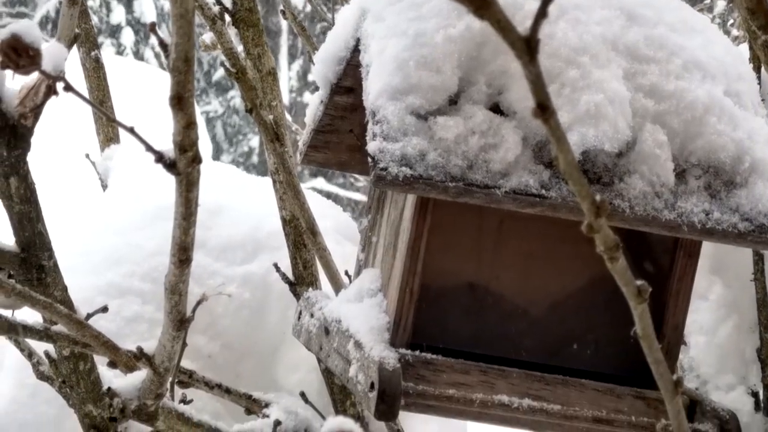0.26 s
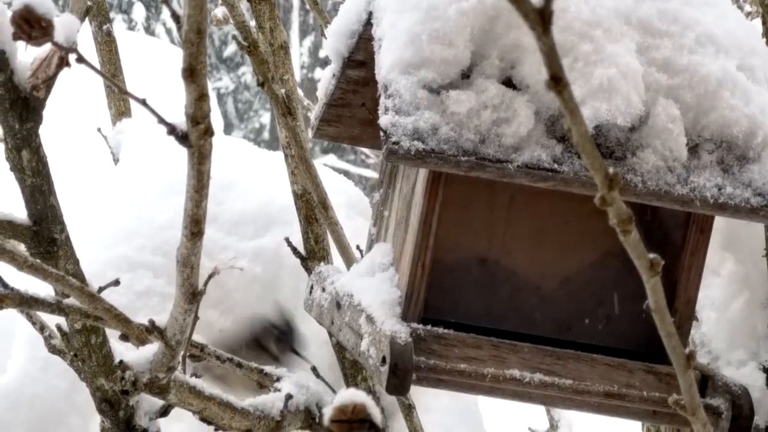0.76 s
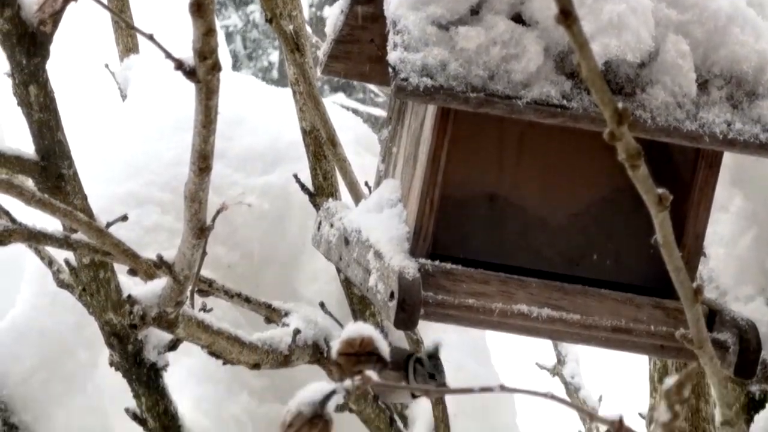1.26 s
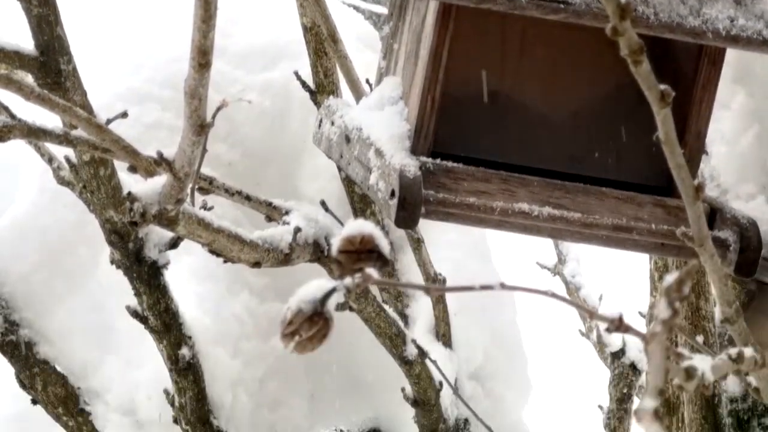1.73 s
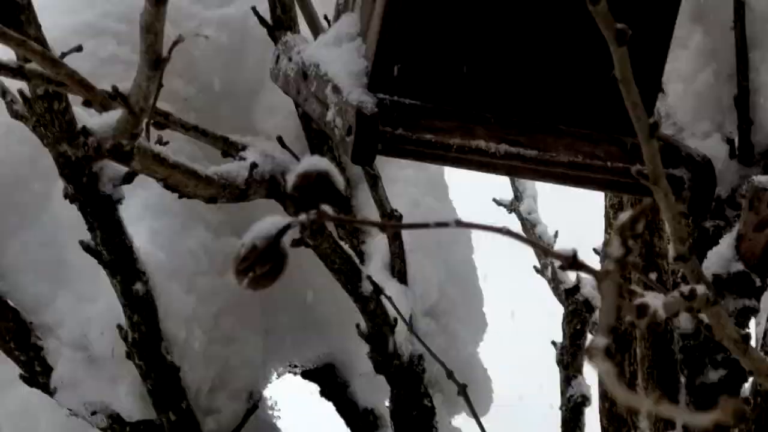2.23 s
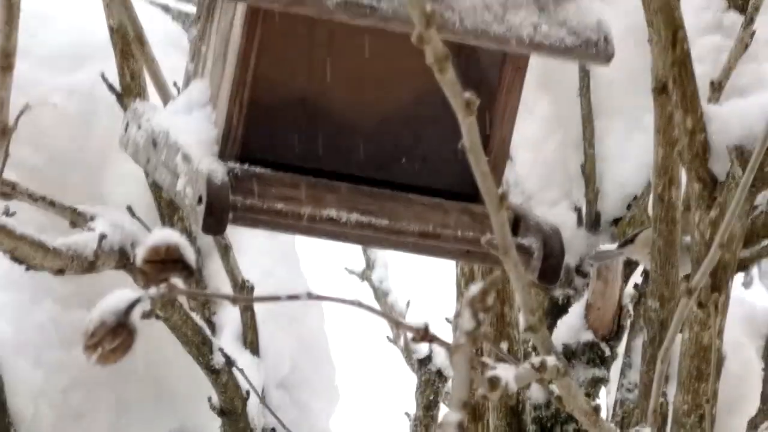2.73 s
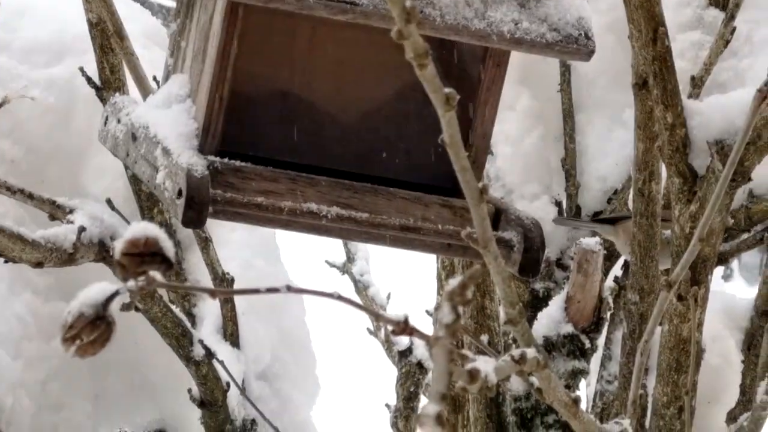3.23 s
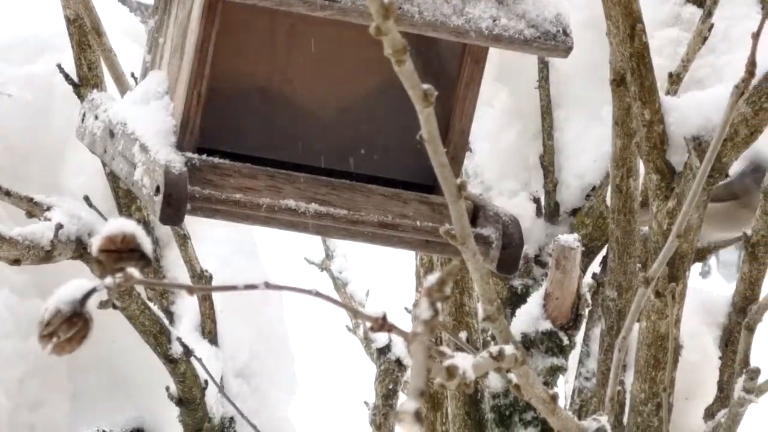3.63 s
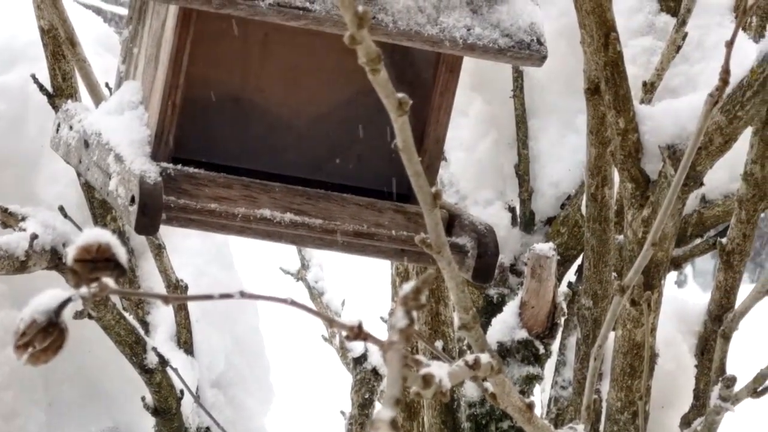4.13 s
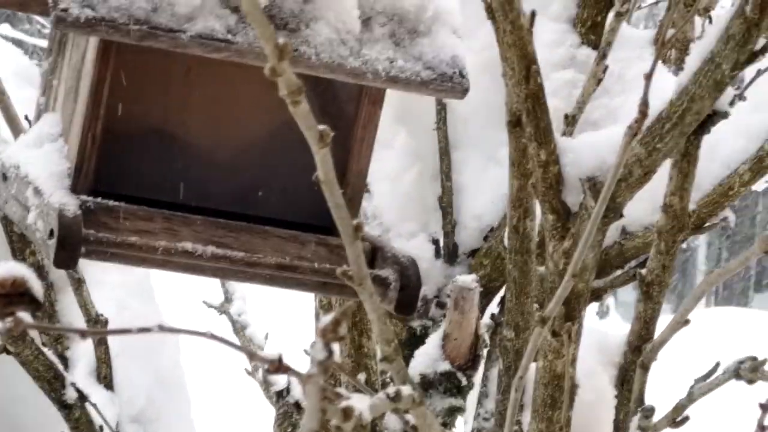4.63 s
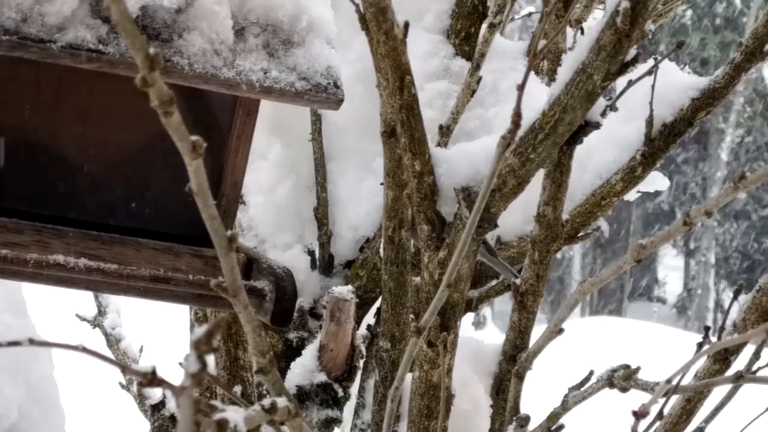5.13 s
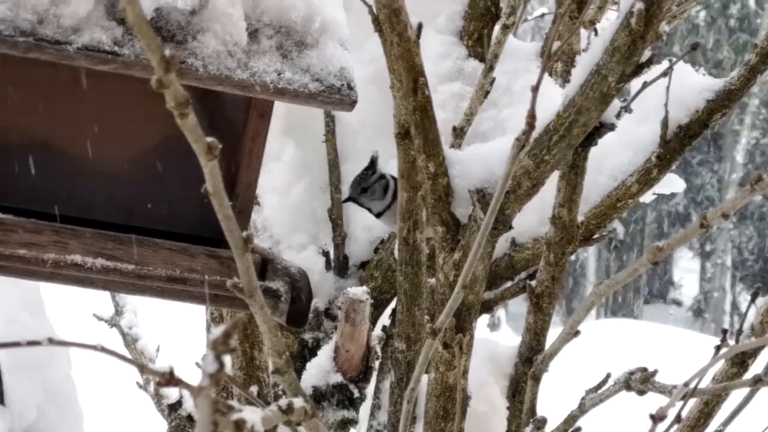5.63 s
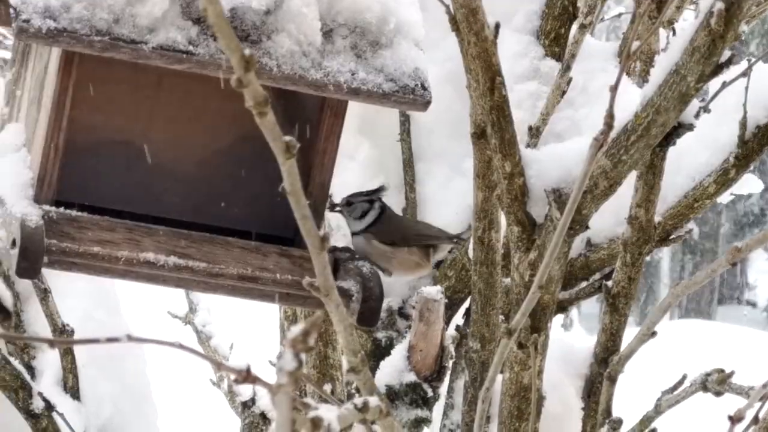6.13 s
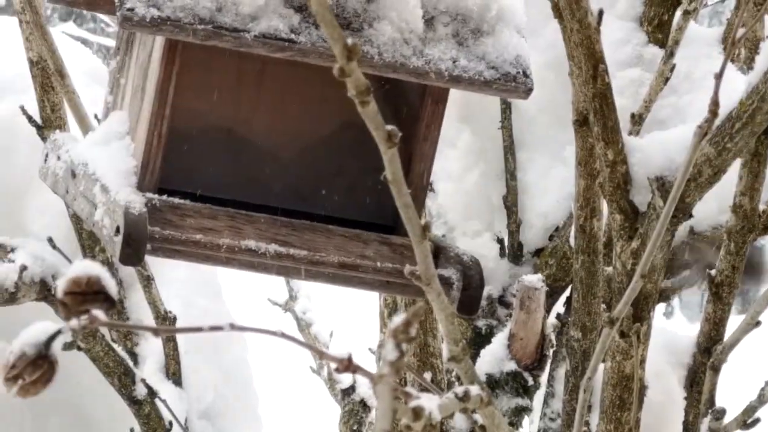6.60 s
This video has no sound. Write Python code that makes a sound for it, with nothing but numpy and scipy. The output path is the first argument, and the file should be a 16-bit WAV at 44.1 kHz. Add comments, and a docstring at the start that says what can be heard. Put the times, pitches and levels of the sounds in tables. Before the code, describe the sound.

Stereo outdoor microphones near a feeder pick up two rapid, rolling tit trills, one at the start and one just after the middle. Between them come dry taps, dull snow bumps on the left, gliding whistles and a blurred distant flock. Short bird peeps sit to the right, wings whirr briefly, and faint rushing and low buffeting come and go. Sparse echoes among branches soften the farther calls.

```python
"""Snowy garden with a wooden feeder: a crested tit gives two purring trills (harmonic sums) and thin contact notes.
Other tits whistle and chirp further off (gliding tones with echoes); a distant flock is many blurred slurs.
Wings whirr (pulsed noise); snow taps twigs (short rings) and thumps on the left microphone (low-cut pulses).
A high hiss lies under the first trill and then drops; the nearly still air has faint rush and buffeting (noise)."""
import sys
import numpy as np
from scipy import signal
from scipy.fft import rfft, irfft
from scipy.io import wavfile

SR = 44100
rng = np.random.default_rng(int(sys.argv[2]) if len(sys.argv) > 2 else 0)


def wav_record(signal):
    """Record a signal, one row per channel, as 16-bit PCM in the file named by sys.argv[1]."""
    frames = np.transpose(np.atleast_2d(signal))
    bounded = np.clip(frames, -1, 1)
    # unit amplitude maps onto the largest positive 16-bit level
    quanta = np.round(bounded * 32767).astype(np.int16)
    wavfile.write(sys.argv[1], SR, quanta)


N = 302526
TIME_S = np.arange(N) / SR

# Still air and microphone hiss: (frequency [Hz], relative density [dB])
AIR_SPECTRUM = [(12, -49), (20, 0.5), (176, -9), (260, -15), (316, -13.5), (508, -19), (618, -19),
                (1020, -23.5), (1890, -22.5), (2170, -26), (3680, -26.5), (4870, -22.5), (9770, -37.5),
                (13700, -27.5), (15700, -27)]
# Microphone colour: (frequency [Hz], gain [dB])
MIC_TREBLE = [(3500, 1), (4200, -10), (4800, -6), (5600, -1), (6600, 3), (7600, -4), (8800, -1.5),
              (10000, -5.5), (11500, 0), (13200, 2), (15800, -0.5)]
# Left-right likeness of still air: (frequency [Hz], correlation [-1 to 1])
AIR_LIKENESS = [(60, 0.085), (150, 0.43), (380, 0.34), (950, 0), (2380, 0), (5980, 0.01), (15000, -0.0)]
AIR_LEVEL_DB = -64  # before MIC_TREBLE

# Narrow high hiss: (frequency [Hz], relative level [dB])
HISS_SPECTRUM = [(1000, -23), (2500, -23), (3600, -20), (4200, -5), (4500, 1.5), (4800, 5), (5400, -17.5),
                 (6700, -10.5), (7350, 2), (7800, -2.5), (8400, -11), (9500, -26.5), (12000, -32),
                 (15000, -25)]
# Hiss level before left-right skew: (time [s], level [dB])
HISS_LEVEL = [(0, -53), (.52, -53), (.55, -74.5)]

# Rush in the trees: (frequency [Hz], relative level [dB])
RUSH_SPECTRUM = [(60, 1.5), (200, 3), (450, 4.5), (850, 3), (1300, -5), (2000, -7), (3000, -8.5),
                 (8000, -52)]
# Rush swells before RUSH_TRIM_DB: (time [s], half width [s], level [dB])
BREEZE_SWELLS = [(1.1, 0.4, -73), (2.4, 0.48, -66), (4.85, 0.28, -68), (5.95, 0.24, -61.5),
                 (6.4, 0.11, -66)]
BREEZE_CALM_DB, RUSH_TRIM_DB = -79, -3.5  # calm is also before trim

# Buffeting: (frequency [Hz], relative level [dB])
BUFFET_SPECTRUM = [(4, -12), (15, -3.5), (30, -13), (60, -15.5), (200, -41.5), (1000, -76)]
# Gusts on the microphones before GUST_TRIM_DB: (time [s], half width [s], level [dB])
GUST_SWELLS = [(.76, .07, -65), (1.57, 0.053, -54.5), (2.8, 0.21, -60.5), (3.49, 0.047, -48),
               (4.79, 0.11, -51), (6.86, 0.07, -48.5)]
GUST_CALM_DB, GUST_UNEVEN_DB, GUST_TRIM_DB = -65.5, 1, -2.5  # calm is also before trim

# Bouts of the distant flock: (time [s], half width [s], level [dB])
FLOCK_BOUTS = [(1.85, 0.071, -61.5), (4.9, 0.19, -66.5), (6.47, 0.22, -69)]
FLOCK_CALM_DB = -77

# Wing whirrs: (time [s], length [s], level before beat and fade [dB], beat rate [1/s])
WING_FLIGHTS = [(3.427, 0.13, -52, 24.6), (3.778, 0.16, -58.5, 29), (6.625, 0.29, -64.5, 25.7)]
# Wing noise: (frequency [Hz], relative level [dB])
WING_SPECTRUM = [(15, -30), (35, -8), (85, 4), (140, -6), (240, -7), (400, -25), (800, -22.5),
                 (1500, -30.5), (4000, -36), (7500, -28), (10000, -45), (15000, -41)]

# Snow landing on the left microphone: (time [s], push level before shaping [dB], decay [s])
SNOW_THUMPS = [(1.26, -33, 0.011), (1.3488, -27.5, 0.0056), (1.563, -23.5, 0.0019), (1.8313, -27.5, 0.0022),
               (1.894, -37.5, 0.0039), (2.356, -33, 0.0068), (2.4655, -35, 0.0016), (3.152, -38, 0.0017),
               (4.5356, -29.5, 0.0027), (4.613, -24.5, 0.0013), (5.862, -39.5, 0.004),
               (6.416, -28, 0.00075), (6.457, -31, 0.0013)]
# Snow tapping wood and twigs: (time [s], level [dB], ring [Hz])
SNOW_TAPS = [(1.604, -51.5, 800), (1.686, -51.5, 900), (1.8663, -41, 855), (1.9227, -41.5, 965),
             (1.88, -49, 6760), (2.645, -50, 5200), (2.677, -46.5, 4750), (2.7147, -41.5, 4800),
             (2.803, -57, 3000), (2.8175, -54, 2500), (3.145, -48, 13470)]
TAP_DECAY_1KHZ_S, TAP_DECAY_POWER = 0.0016, 0.43  # higher taps are shorter

# Hoarse chirps from the trees, before pan and echo:
# (time [s], length [s], start pitch [Hz], end pitch [Hz], rms level [dB])
TREE_CHIRPS = [(0.794, 0.031, 3180, 4560, -62), (1.177, .055, 7150, 6380, -71.5),
               (1.338, 0.037, 7540, 4170, -72), (1.479, 0.058, 4960, 3440, -66),
               (1.74, 0.081, 3510, 5430, -67), (4.842, 0.016, 4800, 3130, -56),
               (4.912, 0.097, 2980, 4100, -72.5), (5.005, 0.11, 3580, 5040, -71),
               (5.273, .1, 3230, 4510, -66), (6.384, 0.059, 5800, 4330, -59.5),
               (6.681, 0.045, 4700, 4880, -61), (6.726, 0.049, 4920, 5030, -58)]
CHIRP_ROUGH, CHIRP_ECHO_DB, CHIRP_PAN_DB = 0.425, -3.5, 1.5
# Whistled slurs further off, before pan and echo: (time [s], length [s], start pitch [Hz],
# middle pitch [Hz], end pitch [Hz], rms level [dB], left over right [dB])
FAR_WHISTLES = [(1.643, 0.23, 7100, 6235, 5550, -58.5, 0.5), (1.666, 0.16, 5500, 5230, 5000, -69, 5),
                (1.79, .19, 4960, 4810, 4820, -67, 9), (1.801, .075, 1624, 1710, 2040, -71, 2),
                (1.812, .078, 3300, 3560, 4400, -58.5, 4), (1.97, 0.16, 7900, 7870, 7550, -72.5, -14),
                (2.126, .09, 4300, 4520, 4400, -75, 5), (2.4, 0.063, 4250, 4550, 4400, -74, 3),
                (2.55, 0.084, 3950, 4250, 4300, -75.5, 6), (3.073, .095, 4800, 4880, 4620, -57.5, -8),
                (3.147, .13, 4585, 4370, 4180, -61, -3.5), (3.292, .045, 3700, 3290, 3170, -71, 4),
                (4.583, .12, 6150, 5920, 5500, -73, -1), (5.046, 0.089, 2640, 2715, 2770, -72.5, 5),
                (5.306, 0.063, 4440, 4850, 4530, -63, 1), (5.356, 0.061, 4340, 4650, 4870, -68, -2),
                (5.422, 0.032, 3165, 3090, 3030, -66.5, -1.5), (5.442, 0.2, 7590, 7080, 7137, -74.5, -11),
                (5.948, 0.085, 4900, 4890, 4340, -69, -4.5), (6.473, 0.12, 4020, 4160, 4300, -60.5, -2)]
WHISTLE_ROUGH, WHISTLE_ECHO_DB = 0.16, -6
# Contact notes of the near bird, before pan and echo:
# (time [s], length [s], top pitch [Hz], rms level [dB])
CONTACT_NOTES = [(0.713, 0.038, 7540, -68), (1.938, .075, 7950, -71.5), (2.331, 0.025, 8000, -69.5),
                 (3.242, .024, 6970, -47), (5.78, 0.05, 8770, -66.5), (5.944, .042, 8620, -66.5),
                 (6.018, .06, 8220, -66), (6.117, 0.078, 8350, -59.5), (6.227, 0.066, 8330, -61.5),
                 (6.362, .064, 8470, -62.5), (6.614, .027, 7530, -43.5), (6.666, 0.035, 7700, -67)]
CONTACT_DROOP = 0.18  # both ends lie this share under the top
CONTACT_PAN_DB, CONTACT_ROUGH, CONTACT_ECHO_DB = -11, 0.15, -10

# Trill syllables, level before throat, attack and pan:
# (time at arch top [s], pitch there [Hz], level [dB])
TRILL_SYLLABLES = [ (0.048, 1803, -39), (0.093, 1850, -35), (.141, 1915, -36), (.190, 1946, -34),
                   (0.241, 1880, -36), (.299, 1920, -35), (.357, 1864, -35.5), (0.423, 1835, -34.5),
                   (3.749, 1850, -40), (3.788, 1794, -37.5), (3.831, 1853, -36.5), (3.877, 1912, -33.5),
                   (3.931, 1926, -32), (3.989, 1955, -31), (4.042, 1970, -31.5), (4.104, 1922, -32),
                   (4.166, 1947, -31.5), (4.228, 1926, -32.5), (4.290, 1935, -32.5), (4.354, 1947, -32),
                   (4.426, 1886, -35)]
# The two trills: (start [s], end [s], left over right [dB], lag of left [s], third harmonic of arch [dB])
TRILL_RUNS = [(0, .5, 2, -.0005, 7), (3.7, 4.5, -5, .00058, -0.5)]
# Throat and beak: (frequency [Hz], gain [dB])
THROAT_GAIN = [(700, -33), (1300, -13), (1800, -11), (2200, -9.5), (2600, -2.5), (3100, -4.5), (3800, -7),
               (4200, -4), (4750, 4.5), (5400, -6), (6300, -9), (7600, -18.5), (8600, -36.5), (11000, -34),
               (15000, -24.5)]
# First trill from another perch, past the feeder: (frequency [Hz], gain [dB])
PERCH_GAIN = [(1800, 0), (2400, -3), (2850, 11), (3300, -1.5), (3800, -3), (4200, -2.5), (4800, 2.5),
              (5700, 1.5), (7000, -3.5), (9000, -5), (15000, 12)]
# Hollow of the feeder: (frequency [Hz], gain [dB])
FEEDER_CAVITY = [(2000, -28.5), (3100, -18), (3650, 2.5), (4200, -19), (7000, -29)]
# Rasp register: (harmonics 1, 2, 3, 4, each of 5-8 [dB])
RASP_HARMONICS = (-12, -11.5, -2, -12.5, -6.5)
# Arch register: (harmonics 1, 2, 3, 4, each of 5-8 [dB])
ARCH_HARMONICS = (-23.5, 0, -15, -7, -17)
# Break-up register: (harmonics 1, 2, 3, 4, each of 5-8 [dB])
BREAK_HARMONICS = (-14, -1, -25, -0.5, 0.5)
LEAD_SHARE = .49  # share of the beat before the arch top, so syllables lengthen as the trill slows
RISE_SHARE = .37  # last part of the lead, the clean rise
LOCK_S, BREAK_S, SWITCH_S = 0.0014, 0.0066, 0.0004  # time to lock, break-up after top, time to break
FALL_S, FALL_DROP = .0105, 0.412  # pitch falls by this share, ever faster
RASP_PITCH, RASP_SAG = .82, .17  # shares of top pitch: rasp, and how much lower it starts
RASP_GROWTH_DB = 15  # swell towards the arch
RASP_DB, RASP_FOLLOWS, USUAL_DB = -37.5, 0.28, -28.5  # rough parts follow syllable level only a little
SOFT_RASP = 0.93  # dB more second harmonic per dB that a syllable is softer
ROUGH_RASP, ROUGH_ARCH, ROUGH_BREAK, ROUGH_ONSET = .45, 0.078, 0.39, .7  # onset adds to rasp
ATTACK_DB = 1  # arch drive at its foot, relative to its top
TURBULENCE_DB = -3.5  # rushing air, against the rasp
WHIM_DB = 2  # chance spread of rasp and break-up harmonics between syllables

EDGE_HZ = 15750


def amp(db):
    """Decibels to gain."""
    return 10 ** (np.asarray(db) / 20)


def evened(x):
    """Scales to rms 1."""
    return x / np.sqrt(np.mean(x ** 2) + 1e-20)


def read(points, hz):
    """Interpolates a spectrum on a log-frequency axis."""
    point_hz, value = np.transpose(points)
    return np.interp(np.log(hz + 1), np.log(point_hz + 1), value)


def coloured(x, points):
    """Filters by a spectrum in dB."""
    gain = amp(read(points, np.fft.rfftfreq(x.shape[-1], 1 / SR)))
    return irfft(rfft(x) * gain, x.shape[-1])


def level(curve):
    """Turns a (time, dB) curve into a gain per sample."""
    return amp(np.interp(TIME_S, *np.transpose(curve)))


def swells(rows, calm_db):
    """Adds bell-shaped swells to a steady gain, in power."""
    power = amp(calm_db) ** 2
    for s, width_s, db in rows:
        bell = np.exp(-.5 * ((TIME_S - s) / width_s) ** 2)
        power = power + (amp(db) * bell) ** 2
    return np.sqrt(power)


def switch(t, seconds):
    """Soft step from 0 to 1 at t = 0."""
    return .5 + .5 * np.tanh(t / seconds)


def wander(size, hz):
    """Smooth chance of about rms 1, changing at up to about hz."""
    f = np.fft.rfftfreq(size + 4096, 1 / SR)
    spectrum = rfft(rng.standard_normal(2 * len(f) - 2))
    return evened(irfft(spectrum * np.exp(-.5 * (f / hz) ** 2)))[:size]


def noise(points, same):
    """Coloured stereo noise of rms 1 with the given left-right likeness."""
    a, b = rfft(rng.standard_normal((2, N)))
    same = np.clip(same, -1, 1)
    stereo = irfft([a, same * a + np.sqrt(1 - same ** 2) * b], N)
    return evened(coloured(stereo, points))


def add(mix, s, sound):
    """Adds a stereo sound at time s."""
    part = mix[:, max(round(s * SR), 0):][:, :sound.shape[1]]
    part += sound[:, :part.shape[1]]


def placed(x, pan_db, lag_s):
    """One sound at two microphones; the left lags by lag_s and is pan_db stronger."""
    shift = round(lag_s * SR)
    late, early = max(shift, 0), max(-shift, 0)
    left = np.pad(x, (late, early)) * amp(pan_db / 2)
    right = np.pad(x, (early, late)) * amp(-pan_db / 2)
    return np.array([left, right])


def echoes(x, t60_s, first_s):
    """Scattering from many branches: sparse taps of random sign that die away."""
    t = np.arange(SR) / SR
    signs = rng.choice([-1., 1.], (2, SR))
    hits = rng.random((2, SR)) < 3000 / SR  # about 3000 taps per s
    taps = signs * hits * (t > first_s) * amp(-60 * t / t60_s)
    return signal.fftconvolve(x, taps / np.linalg.norm(taps, axis=1, keepdims=True), axes=1)[:, :N]


def among_trees(x, echo_db):
    """Trees return a short and a long echo; what is scattered is lost to the direct path."""
    wet = echoes(x, t60_s=0.087, first_s=0.0021) + amp(-7.5) * echoes(x, t60_s=0.5, first_s=0.0068)
    return (x + amp(echo_db) * wet) / np.hypot(1, amp(echo_db))


def air():
    """Noise of still air and microphones, rush in the trees, slow buffeting and the high hiss."""
    same = read(AIR_LIKENESS, np.fft.rfftfreq(N, 1 / SR))
    still = amp(AIR_LEVEL_DB) * coloured(noise(AIR_SPECTRUM, same), MIC_TREBLE)
    rush = amp(RUSH_TRIM_DB) * swells(BREEZE_SWELLS, BREEZE_CALM_DB) * noise(RUSH_SPECTRUM, 0.54)
    uneven = amp(GUST_TRIM_DB + GUST_UNEVEN_DB * wander(N, 3.5))
    buffet = uneven * swells(GUST_SWELLS, GUST_CALM_DB) * noise(BUFFET_SPECTRUM, 0.82)
    hiss = level(HISS_LEVEL) * noise(HISS_SPECTRUM, 0.053) * amp([[-2], [2]])
    return still + rush + buffet + hiss


def twitter(count=700, low_hz=3400, high_hz=5400, sweep=0.29):
    """Distant flock: many short slurs up and down, blurred by the trees."""
    flock = np.zeros((2, N))
    for when, pitch, slope, length, size, side in rng.random((count, 6)):
        u = np.linspace(-1, 1, round((.015 + .03 * length) * SR))
        centre_hz = low_hz + (high_hz - low_hz) * np.sqrt(pitch)
        glide = sweep * np.sign(slope - .5) * (.5 + abs(slope - .5))
        hz = centre_hz * (1 + glide * u)
        slur = size * np.hanning(len(u)) * np.sin(2 * np.pi * np.cumsum(hz) / SR)
        add(flock, when * N / SR, placed(slur, 6 * (side - .5), 0))
    return swells(FLOCK_BOUTS, FLOCK_CALM_DB) * evened(echoes(flock, t60_s=0.22, first_s=0.001))


def wings(depth=0.48):
    """Each wingbeat pushes a puff of air with a faint rustle of feathers."""
    beats = np.zeros((2, N))
    for s, length_s, db, rate_hz in WING_FLIGHTS:
        t = np.arange(round(length_s * SR)) / SR
        fade = np.sin(np.pi * t / length_s)
        beat = 1 + depth * np.cos(2 * np.pi * rate_hz * t)
        add(beats, s, placed(amp(db) * fade * beat, 0, 0))
    return beats * noise(WING_SPECTRUM, 0.94)


def snow(rise_s=0.00073, low_cut_hz=85, leak_db=-34):
    """Flakes press on the left microphone, whose low cut rounds each push to a thump; others tap wood."""
    pushes, taps = np.zeros((2, 2, N))
    t = np.arange(2000) / SR
    for s, db, decay_s in SNOW_THUMPS:
        push = 2 * (1 - np.exp(-(t / rise_s) ** 2)) * np.exp(-t / decay_s)
        add(pushes, s, amp([[db], [db + leak_db]]) * push)
    for s, db, hz in SNOW_TAPS:
        decay_s = TAP_DECAY_1KHZ_S * (1000 / hz) ** TAP_DECAY_POWER
        grit = np.array([wander(len(t), hz), wander(len(t), hz)])
        ring = np.sin(2 * np.pi * hz * t) + .5 * grit
        add(taps, s, amp(db) * ring * np.exp(-t / decay_s) * (1 - np.exp(-t * hz * 4)))
    low_cut = signal.butter(2, low_cut_hz, "high", fs=SR, output="sos")
    return signal.sosfiltfilt(low_cut, pushes) + taps


def note(length_s, pitches_hz, db, rough, jitter=0.088, jitter_hz=350, flicker_db=2, quaver_db=6):
    """Near-pure tone gliding through evenly spaced pitches; roughness shakes pitch and level."""
    u = np.linspace(0, 1, round(length_s * SR))
    count = len(pitches_hz)
    glide = np.polyfit(np.linspace(0, 1, count), pitches_hz, count - 1)
    hz = np.polyval(glide, u) * (1 + jitter * rough * wander(len(u), jitter_hz))
    shake = amp((flicker_db + quaver_db * rough) * wander(len(u), 83))
    swell = signal.windows.tukey(len(u), .45) * shake
    return amp(db) * evened(swell * np.sin(2 * np.pi * np.cumsum(hz) / SR))


def notes(lag_s=.0004):
    """Arched contact notes close by; whistles and hoarse chirps further off, with more echo."""
    contacts, whistles, chirps = np.zeros((3, 2, N))
    for s, length_s, hz, db in CONTACT_NOTES:
        foot_hz = hz * (1 - CONTACT_DROOP)
        tone = note(length_s, [foot_hz, hz, foot_hz], db, CONTACT_ROUGH)
        add(contacts, s, placed(tone, CONTACT_PAN_DB, lag_s))
    for s, length_s, *pitches_hz, db, pan_db in FAR_WHISTLES:
        add(whistles, s, placed(note(length_s, pitches_hz, db, WHISTLE_ROUGH), pan_db, lag_s))
    for s, length_s, *pitches_hz, db in TREE_CHIRPS:
        add(chirps, s, placed(note(length_s, pitches_hz, db, CHIRP_ROUGH), CHIRP_PAN_DB, lag_s))
    near = among_trees(contacts, CONTACT_ECHO_DB)
    return near + among_trees(whistles, WHISTLE_ECHO_DB) + among_trees(chirps, CHIRP_ECHO_DB)


def syllable(hz, lead_s, db, third_db, jitter=0.1235, jitter_hz=1000, flutter=1.0, drift=.011):
    """Syrinx rasps on its third harmonic, locks to a clean arch on its second, breaks up as pitch drops."""
    t = np.arange(-lead_s, FALL_S, 1 / SR)
    rise_s = RISE_SHARE * lead_s
    rasping = 1 - switch(t + rise_s, LOCK_S)
    breaking = switch(t - BREAK_S, SWITCH_S)
    locked = 1 - rasping - breaking
    early = np.clip((-t - rise_s) / (lead_s - rise_s), 0, 1)  # 1 at start, 0 from foot of arch
    climb = np.cos(np.pi / 2 * np.clip(t / rise_s, -1, 0)) ** 2  # 0 at foot, 1 from top on

    fall = FALL_DROP * (np.maximum(t, 0) / FALL_S) ** 2
    bend = RASP_PITCH - RASP_SAG * early + (1 - RASP_PITCH) * climb - fall
    bend = bend * (1 + drift * wander(len(t), 112))  # no two arches alike
    rough = rasping * (ROUGH_RASP + ROUGH_ONSET * early) + locked * ROUGH_ARCH + breaking * ROUGH_BREAK
    shaken_hz = hz * bend * (1 + jitter * rough * wander(len(t), jitter_hz))
    phase = 2 * np.pi * np.cumsum(shaken_hz) / SR

    hoarse = amp(RASP_DB + RASP_FOLLOWS * (db - USUAL_DB) - RASP_GROWTH_DB * early)
    whim = WHIM_DB * rng.standard_normal(len(RASP_HARMONICS))
    softness = [0, SOFT_RASP * (USUAL_DB - db), 0, 0, 0]
    rasp = np.outer(amp(whim + RASP_HARMONICS + softness), rasping)
    crack = np.outer(amp(whim + BREAK_HARMONICS), breaking)
    attack = amp(ATTACK_DB * (1.5 - climb))
    arch = np.outer(amp(db + np.array(ARCH_HARMONICS) + [0, 0, third_db, 0, 0]), locked * attack)
    arch[2:] *= climb  # overtones open up towards the top

    *low, high = arch + hoarse * (rasp + crack)
    wave = np.zeros(len(t))
    for k, gain in enumerate(low + [high] * 4, 1):
        wave += gain * np.sin(k * phase) * (1 + flutter * rough * wander(len(t), jitter_hz))
    turbulence = amp(TURBULENCE_DB) * hoarse * rough * wander(len(t), 5000)
    return np.sqrt(2) * (wave + turbulence) * signal.windows.tukey(len(t), .08)


def trill(start_s, end_s, pan_db, lag_s, third_db):
    """Run of syllables, each with a lead set by the local beat."""
    out = np.zeros((2, N))
    rows = np.array([row for row in TRILL_SYLLABLES if start_s < row[0] < end_s])
    leads_s = LEAD_SHARE * np.gradient(rows[:, 0])
    for (s, hz, db), lead_s in zip(rows, leads_s):
        add(out, s - lead_s, placed(syllable(hz, lead_s, db, third_db), pan_db, lag_s))
    return out


def trills():
    """Throat filters both trills, the feeder rings to the first, branches scatter both."""
    first, second = (trill(*row) for row in TRILL_RUNS)
    dry = coloured(coloured(first, PERCH_GAIN) + second, THROAT_GAIN)
    both = dry + dry[1]  # right channel feeds both sides of the scattering
    near = amp(-14) * echoes(both, t60_s=.012, first_s=.0003)
    ring = amp(-10) * echoes(coloured(first, FEEDER_CAVITY), t60_s=0.065, first_s=.009)
    far = amp(-13.5) * echoes(both, t60_s=0.14, first_s=.003)
    return dry + near + ring + far


def scene():
    """Sums air, flock, wings, snow, notes and trills."""
    return air() + twitter() + wings() + snow() + notes() + trills()


def record(dry):
    """Limits the band with a steep linear-phase low-pass."""
    low_pass = signal.firwin(1023, EDGE_HZ, window=("kaiser", 9), fs=SR)
    return signal.oaconvolve(dry, low_pass[None], "same")


dry = scene()
out = record(dry)
wav_record(out)
```